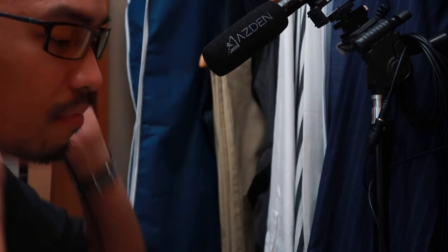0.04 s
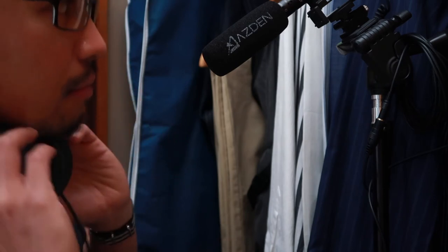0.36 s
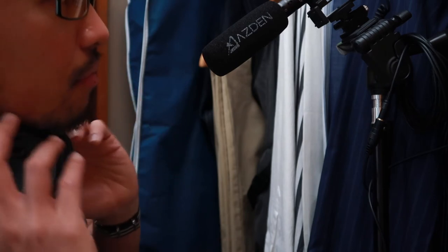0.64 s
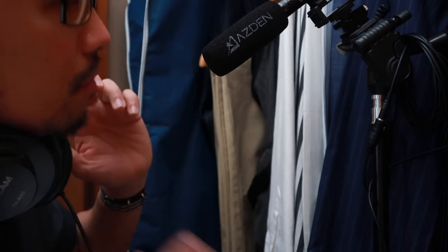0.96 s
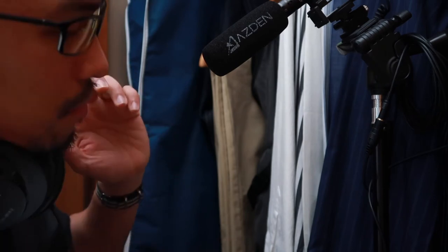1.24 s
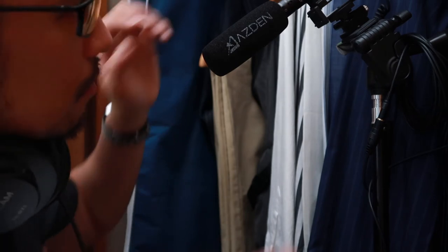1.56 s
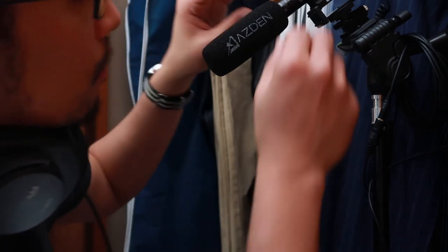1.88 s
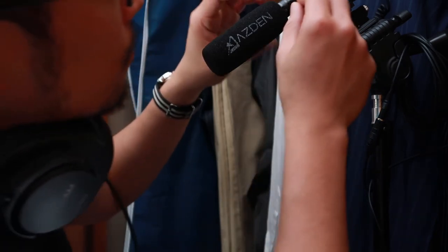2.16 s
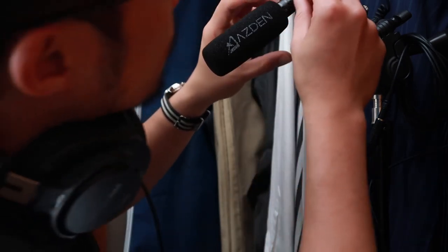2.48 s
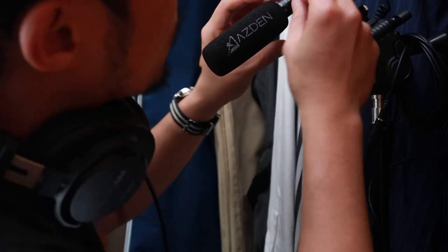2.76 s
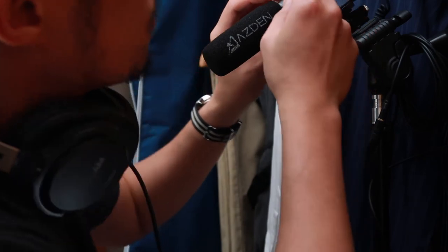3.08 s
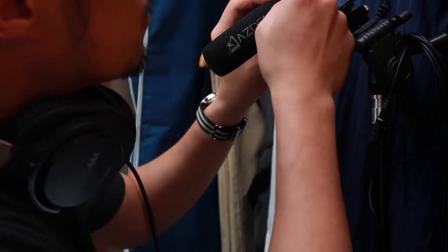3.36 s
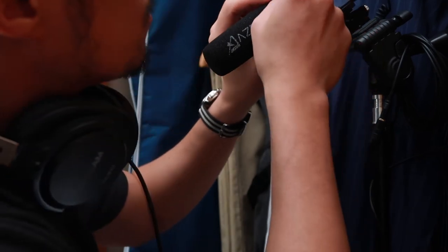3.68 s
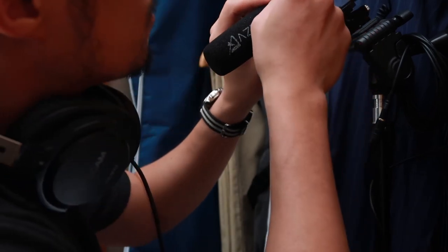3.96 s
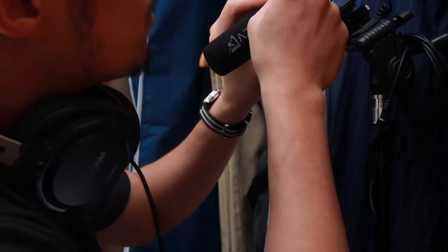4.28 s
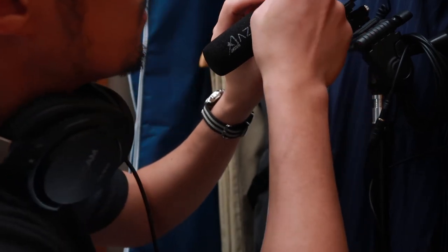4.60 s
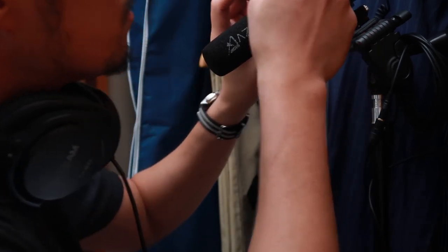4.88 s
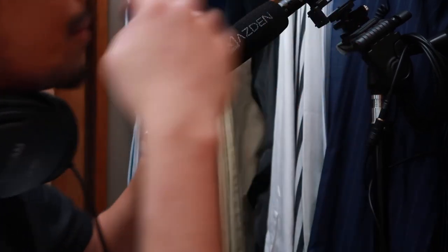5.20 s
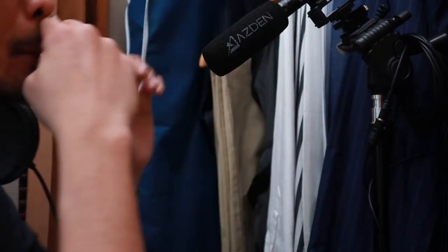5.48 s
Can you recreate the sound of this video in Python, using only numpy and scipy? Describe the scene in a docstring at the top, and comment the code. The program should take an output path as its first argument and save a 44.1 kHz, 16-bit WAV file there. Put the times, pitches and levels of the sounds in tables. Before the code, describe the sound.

Close to the microphone, plastic headphones clack and tick as clothes rustle lightly. Behind them, room rumble, a far engine and hiss step down in level. After a near-silent pause come soft, muffled knocks and skin rubbing on the microphone's metal barrel, with a deep rumble from the stand. A switch cuts the room off and makes two loud, dry electrical clicks plus a few small ones, leaving a thin hiss.

```python
"""Handling and switching off a microphone

Headphones clack as a man settles them round his neck; clothes rustle, plastic ticks. Fingers bump and
rub a shotgun microphone's barrel and its stand rumbles. A far engine, room noise and preamp hiss fall
as the input gain is stepped down. The switch cuts off the room and throws voltage steps into the
preamp: two sharp, dry clicks and a few small ones. Only the hiss remains."""
import sys
import numpy as np
from scipy import signal
from scipy.fft import rfft, irfft
from scipy.io import wavfile

SR = 44100
rng = np.random.default_rng(int(sys.argv[2]) if len(sys.argv) > 2 else 0)


def to_wav(sig):
    """Store sig (one row per channel, or 1-D mono) as 16-bit WAV at the path in sys.argv[1].

    Samples outside -1..1 are clipped; the rate is SR.
    """
    pcm = np.clip(np.atleast_2d(sig), -1, 1) * 32767
    pcm = np.round(pcm).astype(np.int16)
    wavfile.write(sys.argv[1], SR, pcm.T)  # frames by channels


N = 253134
TIME_S = np.arange(N) / SR
MIC_OFF_S = 4.194

# Table levels are relative; each source adds its own gain.
# input gain settings (time [s], gain [dB])
GAIN_STEPS = [(0, -.5), (1.41, -7.5), (2.11, -13.5), (3.525, -18.5), (5.285, -12.5)]
# preamp noise (frequency [Hz], density [dB])
HISS_SPECTRUM = [(14, 38.5), (30, 32.5), (60, 21), (150, 9), (500, 2), (2000, 0), (10000, 1), (16000, 1)]
# room rumble (frequency [Hz], density [dB])
ROOM_SPECTRUM = [(20, -1), (40, 0), (70, -2.5), (110, -8), (170, -12.5), (250, -13), (400, -20), (700, -24),
                 (1500, -31.5), (3000, -38), (6000, -46.5)]
# far engine (time [s], firing rate [Hz], level [dB])
ENGINE_CURVE = [(0, 50.02, -61.5), (.6, 51.9, -59.5), (.8, 55.5, -55.5), (1.07, 52.2, -59),
                (1.3, 61.97, -61), (1.9, 61.7, -64), (2.2, 65, -59), (2.7, 71, -60), (3.2, 69.9, -69)]
# movements that rustle the clothes (start [s], length [s], level [dB])
CLOTH_MOVES = [(0, 0.052, -60), (.08, 0.12, -71), (.24, 0.22, -65.5), (.46, 0.063, -65.5), (.52, .012, -57),
               (.69, 0.04, -73), (.76, .3, -85), (1.13, .1, -70), (1.3, 0.67, -84), (2.48, 0.097, -87.5)]
# sliding fabric (frequency [Hz], density [dB])
CLOTH_SPECTRUM = [(300, -6), (600, -5), (1300, -1.5), (2500, -3), (4000, -4), (7000, -12), (14000, -20.5)]
# headphone joints (time [s], level [dB])
JOINT_CLACKS = [(0.024, -29.5), (0.0437, -37)]
# headband resonances (frequency [Hz], level [dB], t60 [s])
HEADBAND_MODES = [(1655, -13.5, 0.037), (2470, -7.5, 0.05), (2690, -5.5, .035), (3360, -4, .02),
                  (4000, 4, 0.024), (4260, -1, .04), (4930, -7.5, 0.025), (5200, -4, 0.02),
                  (7740, -8.5, .02)]
# ear cup, cable and fingernail knocks (time [s], peak [dB], centre [Hz], half-width [ratio])
SMALL_KNOCKS = [(0.1375, -50, 2690, 0.44), (.3632, -47, 5870, 0.4), (0.3889, -43.5, 4430, 0.65),
                (0.423, -52, 2500, 0.73), (.44, -41.5, 1360, 0.41), (0.5289, -44, 680, 0.53),
                (0.5295, -32.5, 4950, 1.1), (0.7155, -46.5, 2000, 0.57), (1.0728, -41.5, 997, 0.53),
                (1.072, -46, 3200, 0.2), (1.5972, -61, 4010, .2), (3.146, -62.5, 1830, .3),
                (3.202, -65, 2000, 0.93), (3.7698, -70.5, 1770, 0.64)]
# one longer clink (frequency [Hz], peak [dB], t60 [s])
CLINK_MODES = [(1980, -51.5, .075), (2980, -56, 0.032)]
# air wafted by the arms, then hands on the stand (start [s], length [s], level [dB])
STAND_PUSHES = [(.43, 0.046, -43), (.52, 0.143, -47.5), (1.09, 0.036, -47), (1.17, .17, -60),
                (1.91, 0.078, -61), (2.88, 0.15, -52.5), (3.15, 0.086, -50), (3.32, 0.13, -46.5),
                (3.66, 0.046, -45), (3.76, 0.32, -58.5)]
# swaying mount (frequency [Hz], density [dB])
SWAY_SPECTRUM = [(12, -1), (20, 3), (35, -6), (55, -17.5), (110, -29.5), (300, -50)]
# soft bumps that reach the capsule (time [s], peak [dB], contact time [s])
CAPSULE_BUMPS = [(.437, -42.5, 0.0022), (0.528, -47.5, 0.0025), (.648, -42, 0.0033), (1.109, -43, 0.0081),
                 (1.3315, -38, 0.0018), (3.1458, -37, 0.001), (3.161, -42.5, 0.0015),
                 (3.272, -44.5, 0.0024), (3.4095, -29.5, 0.0019), (3.4932, -36.5, 0.0014),
                 (4.09, -40, 0.0013)]
# fingertip taps that only ring the barrel (time [s], level [dB])
BARREL_TAPS = [(3.201, -59), (3.241, -55), (3.354, -55.5), (3.626, -54), (3.645, -49.5), (3.722, -61)]
# barrel resonances (frequency [Hz], level [dB], t60 [s])
BARREL_MODES = [(340, -7.5, 0.021), (529, -3, 0.027), (810, -1.5, 0.025), (1074, -10.5, .025),
                (1560, -14.5, .02)]
# fingers sliding on the barrel (start [s], length [s], level [dB])
FINGER_STROKES = [(3.16, 0.21, -75), (3.365, .04, -65.5), (3.405, 0.014, -58), (3.45, 0.19, -69.5),
                  (3.63, .028, -60.5), (3.7, 0.037, -77.5), (3.785, 0.088, -76.5), (4.02, 0.082, -88.5),
                  (4.13, 0.018, -77)]
# skin on metal (frequency [Hz], density [dB])
RUB_SPECTRUM = [(150, 3.5), (350, -2), (530, -1), (660, -3.5), (860, 0.5), (1100, -3), (1500, -2),
                (2000, -6.5), (2400, -11), (2750, -9), (3400, -18), (4600, -20), (6000, -33), (9000, -31),
                (13000, -44)]
# voltage steps from the switch contacts (time [s], signed height [full scale], rise time [s])
SWITCH_STEPS = [(4.1937, -.0007, .00002), (4.2741, 0.013, .0022), (4.2766, 0.022, .00002),
                (4.2776, -0.082, .00004), (4.3074, 0.092, 0.0067), (4.4141, -0.0064, .00002),
                (4.4364, 0.0033, .00002), (4.5685, -0.045, 0.000019), (4.8552, -.0018, 0.000021)]
# bias sag after the preamp leaves the rail (midpoint [s], half time [s], half depth [full scale])
BIAS_SAG = (4.455, 0.025, 0.019)


def from_db(db):
    """Decibels to gain."""
    return 10 ** (np.asarray(db) / 20)


def unit_rms(x):
    """Scale to rms 1."""
    return x / np.sqrt(np.mean(x ** 2) + 1e-20)


def since(start_s):
    """Seconds elapsed, zero before the start."""
    return np.maximum(TIME_S - start_s, 0)


def butter(x, order, edges_hz, kind="low"):
    """Butterworth filter."""
    return signal.sosfilt(signal.butter(order, edges_hz, kind, fs=SR, output="sos"), x)


def drift(rate_hz):
    """Smooth random wander, rms 1."""
    pole = np.exp(-2 * np.pi * rate_hz / SR)
    wander = signal.lfilter([1], [1, -2 * pole, pole * pole], rng.standard_normal(N + SR))
    return unit_rms(wander[SR:])


def coloured(x, spectrum):
    """Filter by a spectrum that falls away past its ends; rms 1."""
    hz, db = np.transpose(spectrum)
    bins_hz = np.maximum(np.arange(N + 1) * SR / (2 * N), 1)
    skirts = np.minimum(bins_hz / hz[0], 1) ** 2 * np.minimum(hz[-1] / bins_hz, 1) ** 2
    shape = from_db(np.interp(np.log(bins_hz), np.log(hz), db))
    return unit_rms(irfft(rfft(x, 2 * N) * skirts * shape)[:N])


def swells(moves, attack_s, release_s):
    """Envelope: each movement builds, holds and fades; overlaps add in power."""
    power = np.zeros(N)
    for start_s, length_s, db in moves:
        fade = np.maximum(start_s - TIME_S, 0) / attack_s + since(start_s + length_s) / release_s
        power += (from_db(db) * np.exp(-np.minimum(fade, 20))) ** 2
    return np.sqrt(power)


def friction(slips_per_s, spread_db, hiss_rms):
    """Tiny slips of uneven size over a smooth hiss."""
    sizes = from_db(spread_db * np.minimum(rng.exponential(1, N), 4)) * rng.choice([-1, 1], N)
    slips = sizes * (rng.random(N) < slips_per_s / SR)
    return unit_rms(slips) + hiss_rms * rng.standard_normal(N)


def burst(start_s, t60_s):
    """Decaying crack of noise."""
    decay = np.exp(-np.minimum(np.log(1000) * since(start_s) / t60_s, 60))
    return (TIME_S >= start_s) * decay * rng.standard_normal(N)


def ring(force, modes):
    """Decaying sines driven by a force."""
    out = np.zeros(N)
    for hz, db, t60_s in modes:
        radius, step_rad = from_db(-60 / (t60_s * SR)), 2 * np.pi * hz / SR
        feedback = [1, -2 * radius * np.cos(step_rad), radius * radius]
        out += from_db(db) * signal.lfilter([0, np.sin(step_rad)], feedback, force + 1e-18)
    return out


def knock(start_s, peak_db, hz, half_width, t60_s):
    """A crack through one resonance."""
    edges_hz = np.clip([hz / (1 + half_width), hz * (1 + half_width)], 10, .45 * SR)
    tick = butter(burst(start_s, t60_s), 2, edges_hz, "band")
    return from_db(peak_db) * tick / np.abs(tick).max()


def input_gain(turn_s):
    """Gain on background and hiss: one quick turn to each setting."""
    db = np.full(N, float(GAIN_STEPS[0][1]))
    for start_s, new_db in GAIN_STEPS[1:]:
        db += (new_db - db) * np.minimum(since(start_s) / turn_s, 1)
    return from_db(db)


def preamp_hiss(level_db, dip_db, dip_end_s):
    """Preamp noise; dips from the switch opening to the second click."""
    in_dip = (TIME_S > MIC_OFF_S) & (TIME_S < dip_end_s)
    return from_db(level_db + dip_db * in_dip) * coloured(rng.standard_normal(N), HISS_SPECTRUM)


def far_engine(second_harmonic_db, waver_db, rate_wander):
    """Two harmonics of a firing rate that slowly climbs."""
    times_s, rates_hz, levels_db = np.transpose(ENGINE_CURVE)
    firing_hz = np.interp(TIME_S, times_s, rates_hz) * (1 + rate_wander * drift(5.7))
    level_db = np.interp(TIME_S, times_s, levels_db) + waver_db * drift(1.8)
    phase = 2 * np.pi * np.cumsum(firing_hz) / SR
    tone = np.sin(phase) + from_db(second_harmonic_db) * np.sin(2 * phase)
    return np.sqrt(2) * from_db(level_db) * tone


def room_tone(rumble_db, hum_db, hum_hz):
    """Room rumble and faint mains hum."""
    hum = np.sqrt(2) * from_db(hum_db) * np.sin(2 * np.pi * hum_hz * TIME_S)
    return hum + from_db(rumble_db) * coloured(rng.standard_normal(N), ROOM_SPECTRUM)


def clothes(flutter_db):
    """Fabric slides in small uneven surges."""
    sliding = swells(CLOTH_MOVES, attack_s=.027, release_s=.026) * from_db(flutter_db * drift(45))
    slips = friction(slips_per_s=3000, spread_db=2.7, hiss_rms=.6)
    return sliding * coloured(slips, CLOTH_SPECTRUM)


def headphones(crack_db, crack_t60_s, ring_db):
    """Each joint clack is a bright crack plus a brief headband ring."""
    cracks, blows = np.zeros(N), np.zeros(N)
    for start_s, db in JOINT_CLACKS:
        cracks += from_db(db) * burst(start_s, crack_t60_s)
        blows[int(start_s * SR)] = from_db(db)
    cracks = butter(cracks, 1, [2300, 5200], "band")
    return from_db(crack_db) * cracks + from_db(ring_db) * ring(blows, HEADBAND_MODES)


def room_reverb(x, t60_s, wet_db, lowpass_hz):
    """Direct sound plus the short dull tail of a room hung with clothes."""
    age_s = TIME_S[:SR // 2]
    tail = rng.standard_normal(len(age_s)) * np.exp(-np.log(1000) * age_s / t60_s) * (age_s > .003)
    tail = butter(tail, 1, lowpass_hz)
    return x + from_db(wet_db) * signal.fftconvolve(x, tail / np.linalg.norm(tail))[:N]


def ticks(gain_db, t60_cycles, clink_at_s):
    """Light knocks, the higher the shorter, and one ringing clink."""
    knocks = sum(knock(s, db, hz, width, t60_cycles / hz) for s, db, hz, width in SMALL_KNOCKS)
    clink = sum(knock(clink_at_s, db, hz, half_width=.12, t60_s=t60_s) for hz, db, t60_s in CLINK_MODES)
    return from_db(gain_db) * (knocks + clink)


def stand(gain_db, rest_db):
    """The mount sways with a very low rumble, settling after each push."""
    sway = swells(STAND_PUSHES, attack_s=.023, release_s=.05) + from_db(rest_db)
    return from_db(gain_db) * sway * coloured(rng.standard_normal(N), SWAY_SPECTRUM)


def bumps(firm_contact_s, firm_ring_db, skin_lowpass_hz):
    """Bumps push the capsule; bumps and taps ring the barrel. Skin softens both."""
    pushes, blows = np.zeros(N), np.zeros(N)
    for start_s, db, contact_s in CAPSULE_BUMPS:
        age = since(start_s) / contact_s
        pushes -= from_db(db) * age ** 2 * np.exp(2 - np.minimum(2 * age, 60))  # fast rise, slower fall
        ring_db = firm_ring_db - 10 * np.log2(contact_s / firm_contact_s)  # longer contact rings less
        blows[int(start_s * SR)] = from_db(db + ring_db)
    for start_s, db in BARREL_TAPS:
        blows[int(start_s * SR)] = from_db(db)
    thuds = butter(pushes, 1, 22, "high") - ring(blows, BARREL_MODES)
    return signal.sosfilt(signal.cheby1(5, .5, skin_lowpass_hz, fs=SR, output="sos"), thuds)


def finger_rub(gain_db, flutter_db):
    """Skin drags over the barrel, heard through the metal."""
    sliding = swells(FINGER_STROKES, attack_s=.011, release_s=.018)
    flutter = from_db(flutter_db * drift(64))
    slips = friction(slips_per_s=3000, spread_db=4, hiss_rms=.76)
    return from_db(gain_db) * sliding * flutter * coloured(slips, RUB_SPECTRUM)


def switch(coupling_tau_s, rail):
    """Steps leak away through the coupling capacitor; the largest swing sticks at the preamp's rail."""
    steps = sum(height * np.minimum(since(s) / rise_s, 1) for s, height, rise_s in SWITCH_STEPS)
    midpoint_s, half_time_s, half_depth = BIAS_SAG
    sag = half_depth * (1 + np.tanh((TIME_S - midpoint_s) / half_time_s))
    leak = np.exp(-1 / (coupling_tau_s * SR))
    return np.minimum(signal.lfilter([1, -1], [1, -leak], steps - sag), rail)


def scene():
    """The capsule is heard until the switch opens; the preamp hisses throughout."""
    gain = input_gain(turn_s=.022)
    plastic = headphones(crack_db=1.5, crack_t60_s=.011, ring_db=-14)
    plastic += ticks(gain_db=-1, t60_cycles=21, clink_at_s=1.331)
    airborne = room_reverb(plastic, t60_s=.14, wet_db=-14.5, lowpass_hz=4945) + clothes(flutter_db=1.5)
    handling = finger_rub(gain_db=-2, flutter_db=2)
    handling += bumps(firm_contact_s=.00095, firm_ring_db=-12, skin_lowpass_hz=980)
    handling += stand(gain_db=-2, rest_db=-78.5)
    background = far_engine(second_harmonic_db=-15.5, waver_db=1.5, rate_wander=.012)
    background += room_tone(rumble_db=-62.5, hum_db=-73.5, hum_hz=119.7)
    capsule = airborne + handling + gain * background
    hiss = gain * preamp_hiss(level_db=-66.5, dip_db=-6, dip_end_s=4.57)
    mic_on = np.clip(1 - since(MIC_OFF_S) / .00307, 0, 1)
    return (mic_on * capsule + hiss + switch(coupling_tau_s=.12, rail=.0415))[None]


def record(dry):
    """The top octave rounds off, then is cut steeply."""
    rounded = butter(dry, 3, 14500)
    return signal.sosfilt(signal.ellip(10, .1, 80, 16200, fs=SR, output="sos"), rounded)


dry = scene()
out = record(dry)
to_wav(out)
```